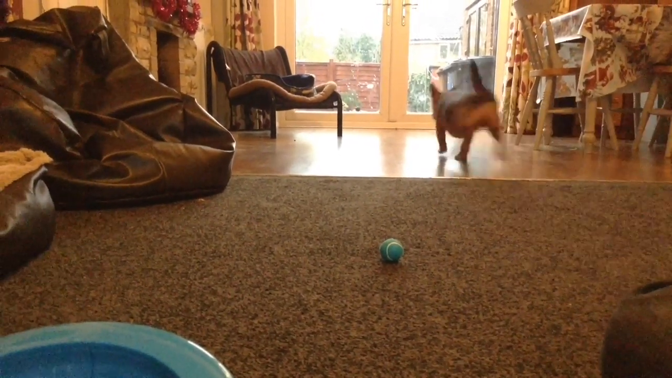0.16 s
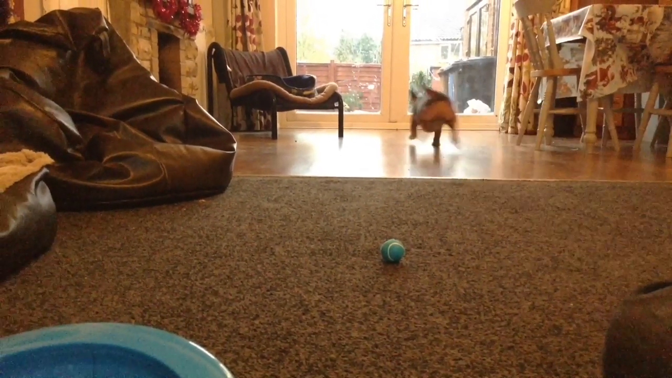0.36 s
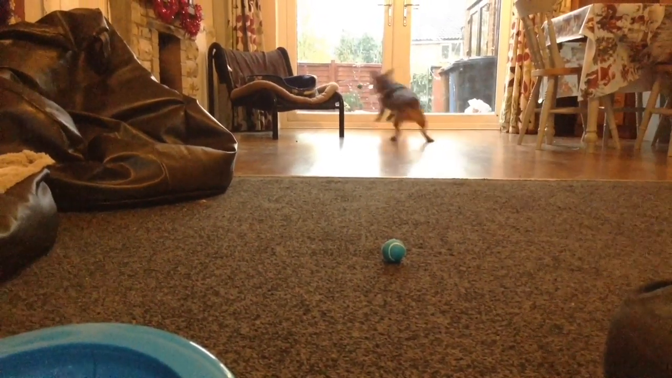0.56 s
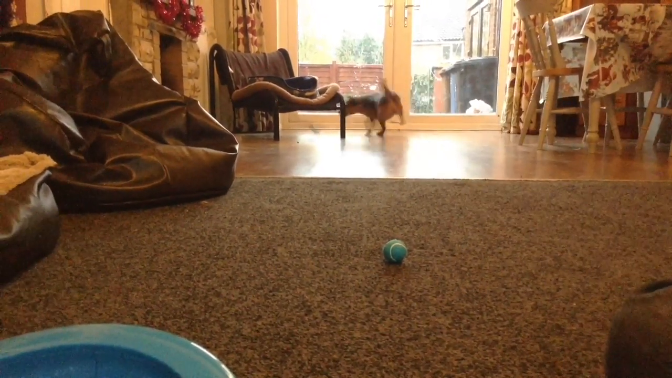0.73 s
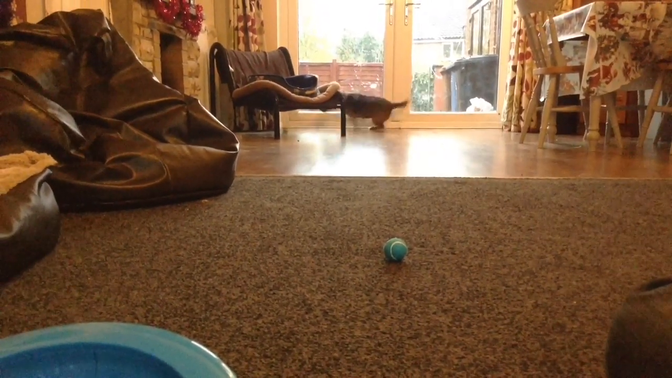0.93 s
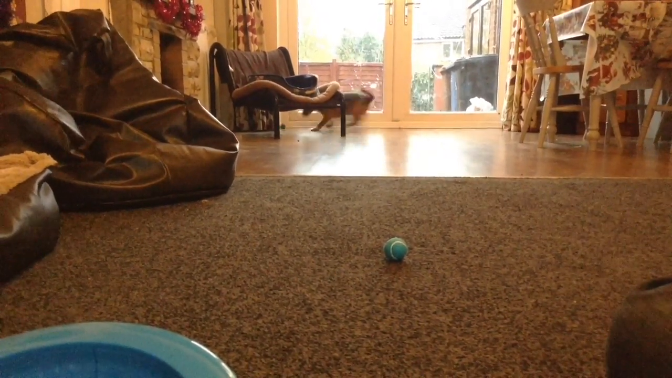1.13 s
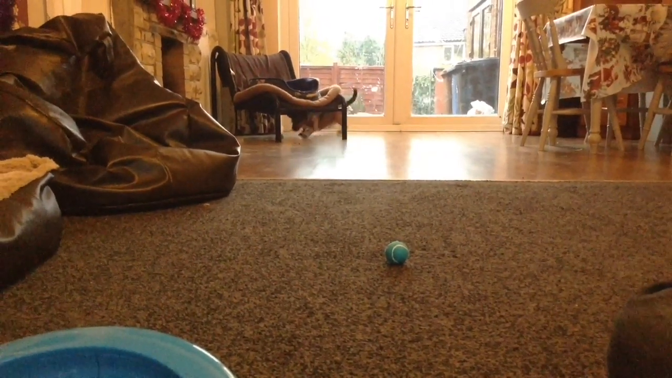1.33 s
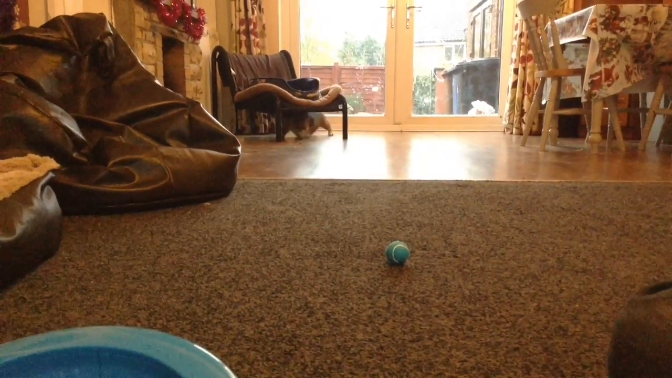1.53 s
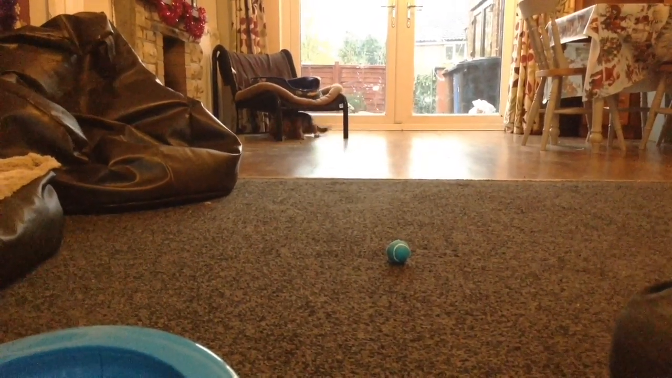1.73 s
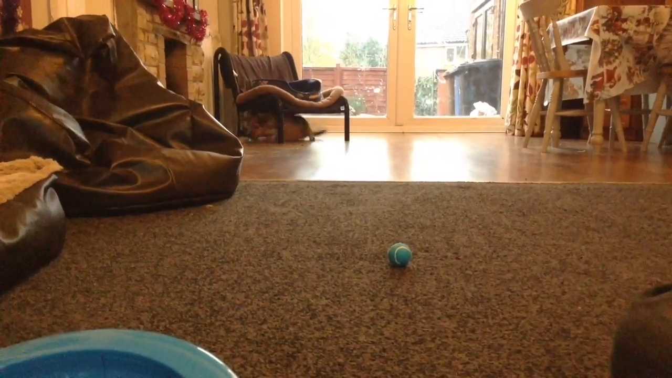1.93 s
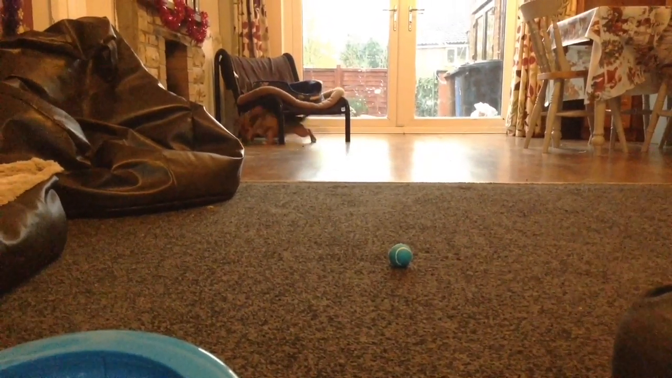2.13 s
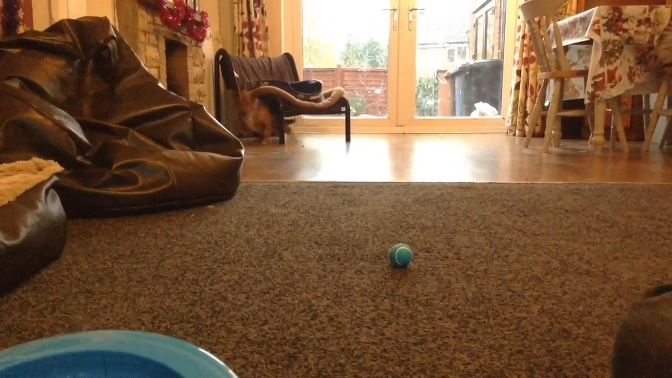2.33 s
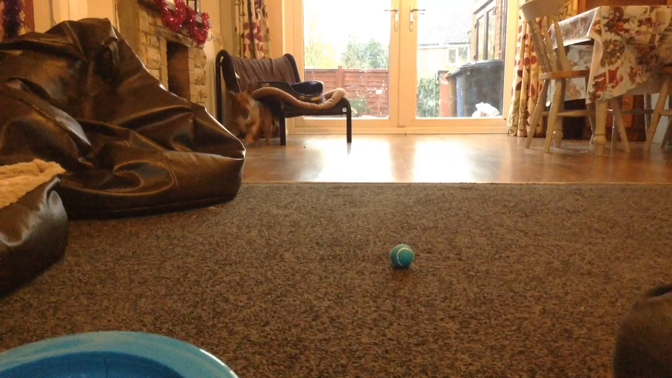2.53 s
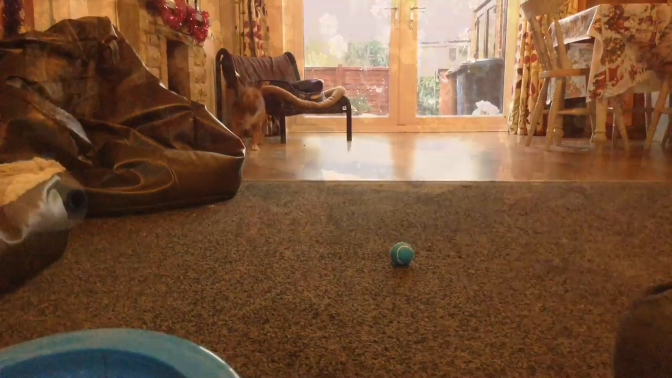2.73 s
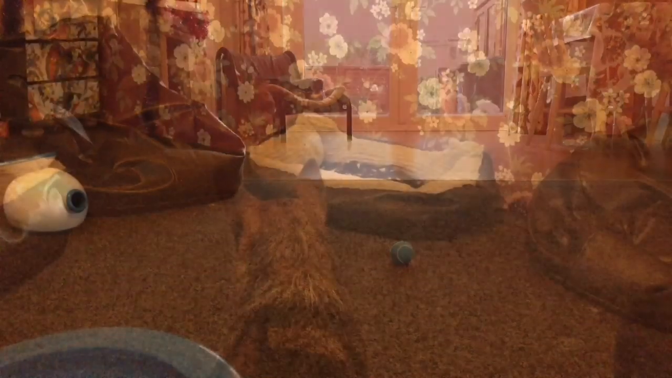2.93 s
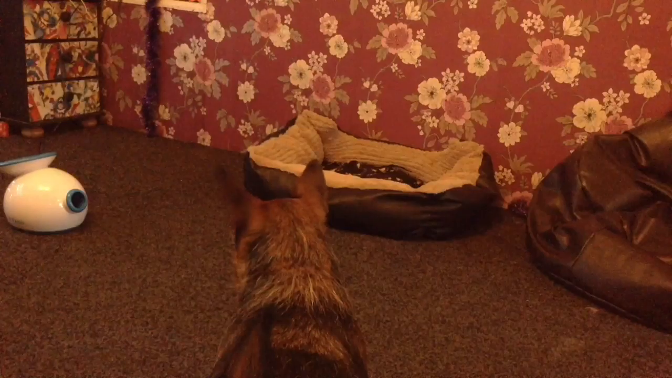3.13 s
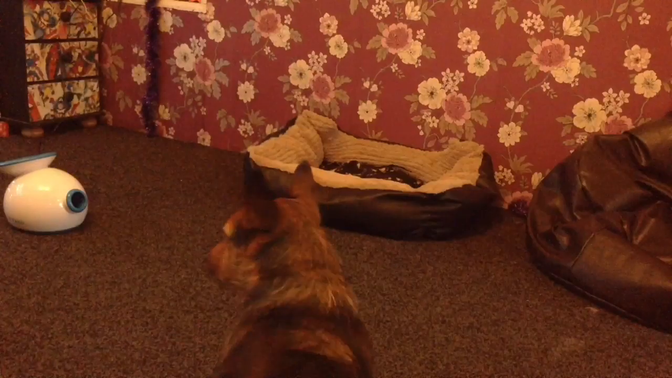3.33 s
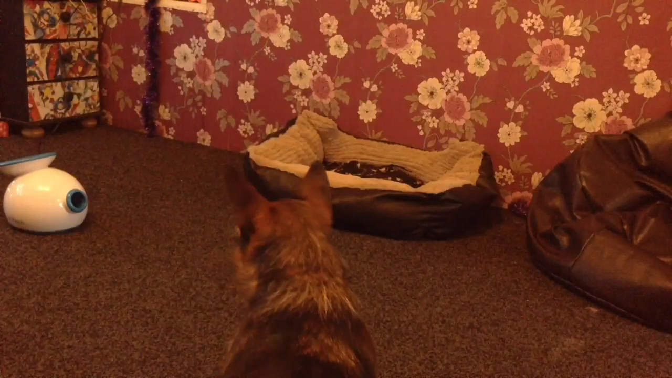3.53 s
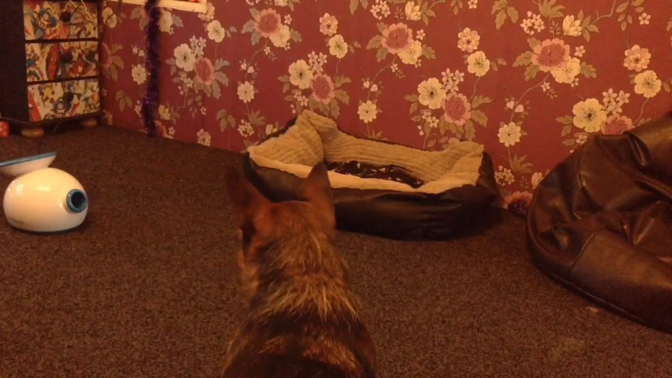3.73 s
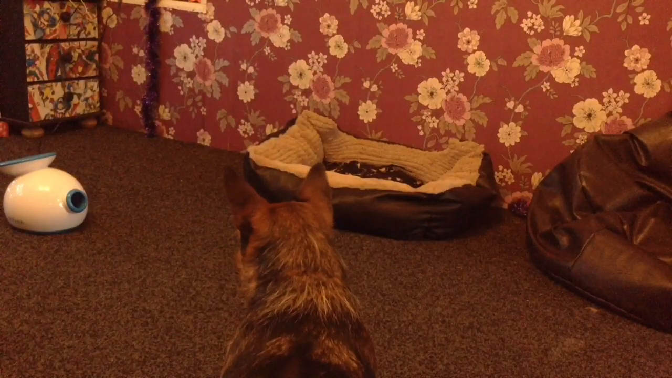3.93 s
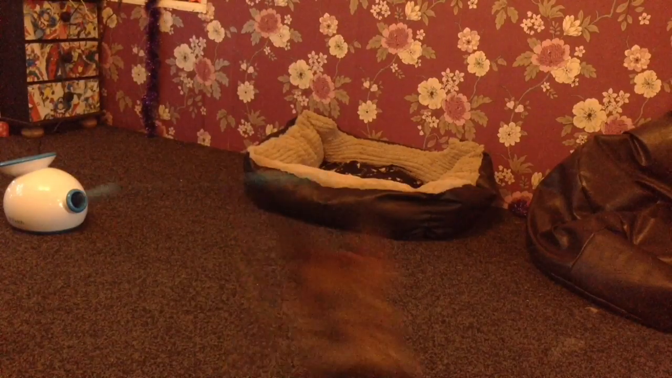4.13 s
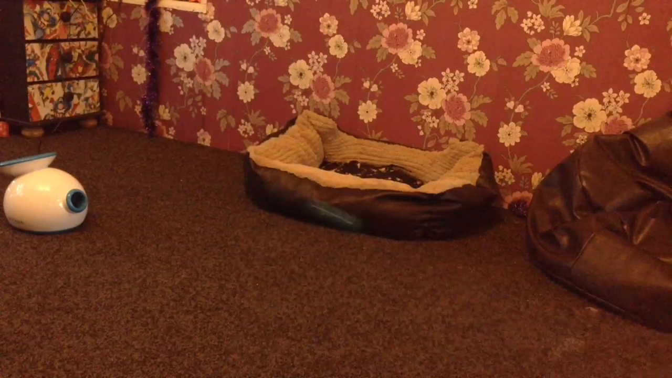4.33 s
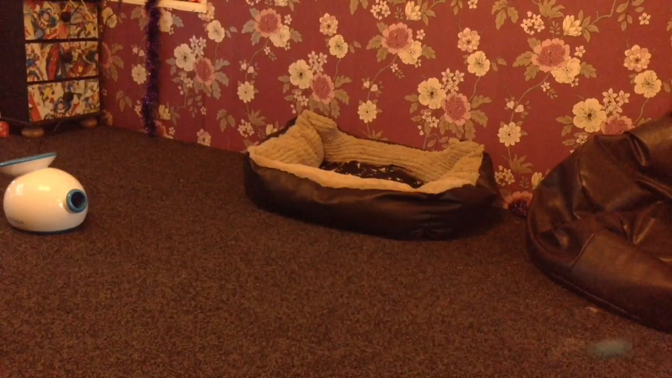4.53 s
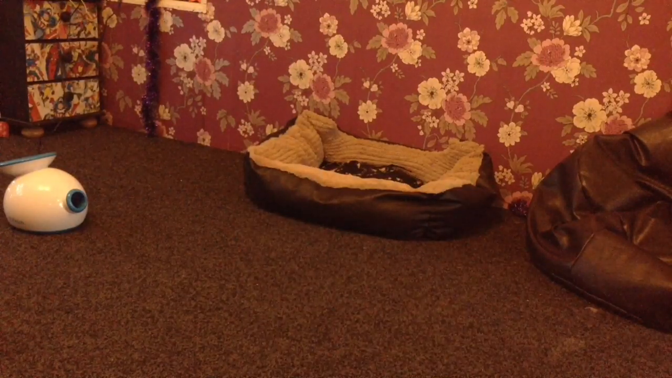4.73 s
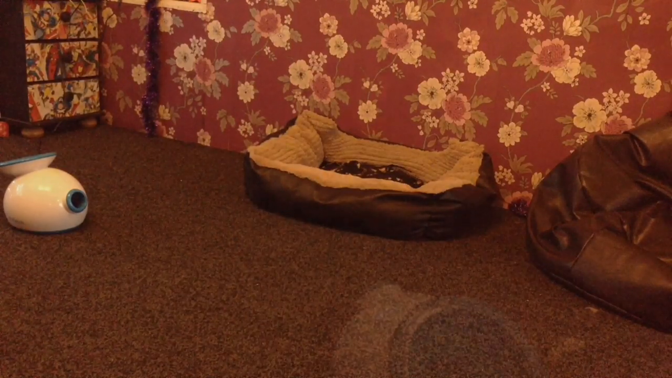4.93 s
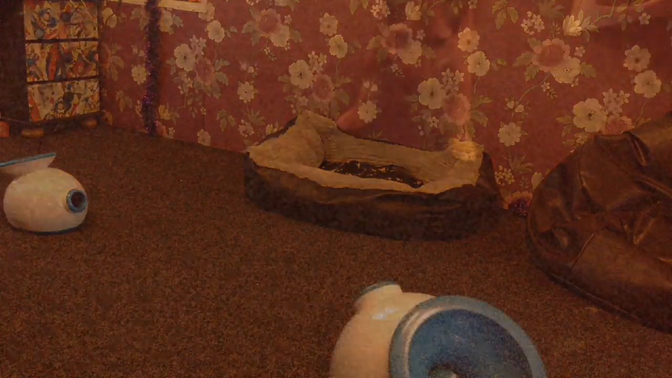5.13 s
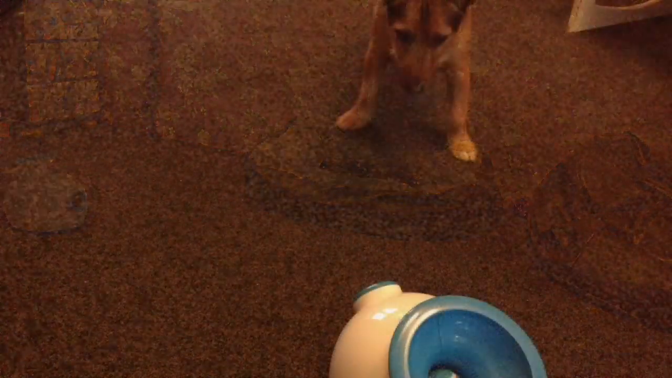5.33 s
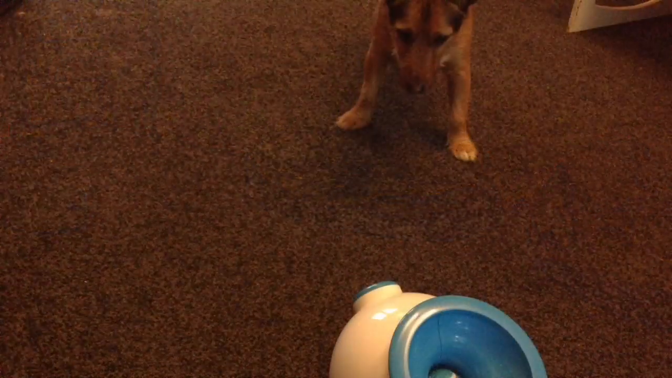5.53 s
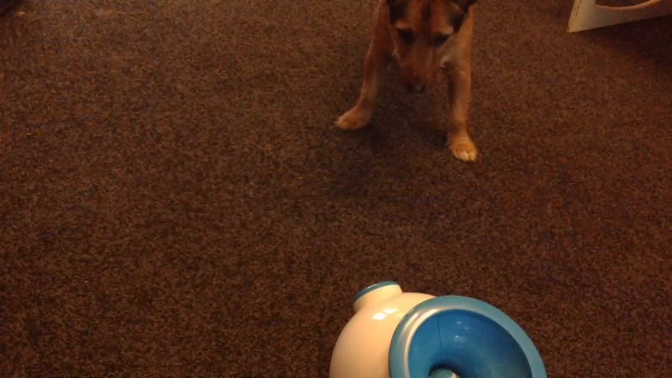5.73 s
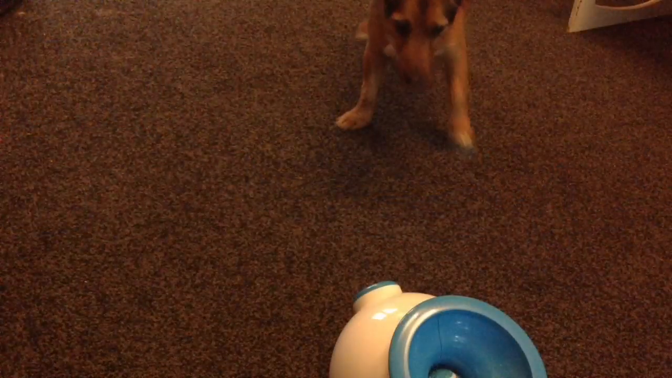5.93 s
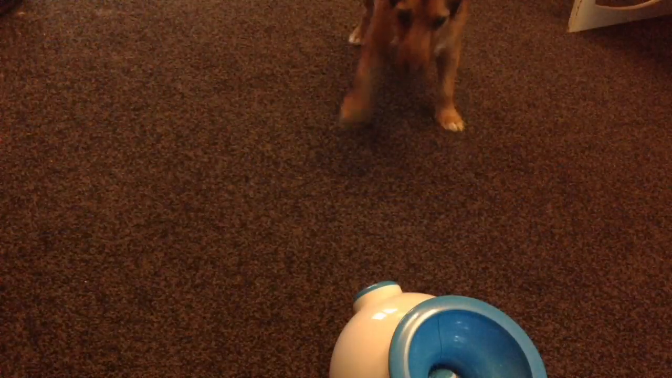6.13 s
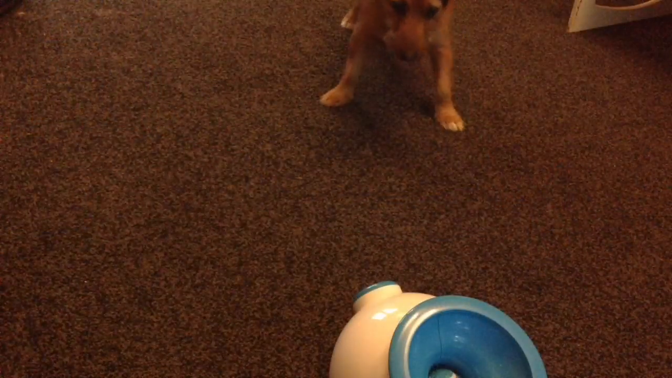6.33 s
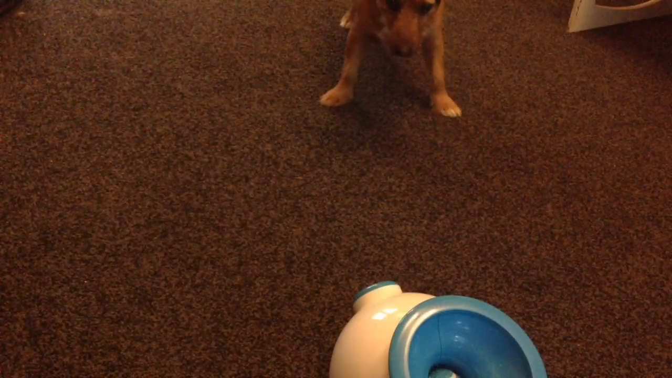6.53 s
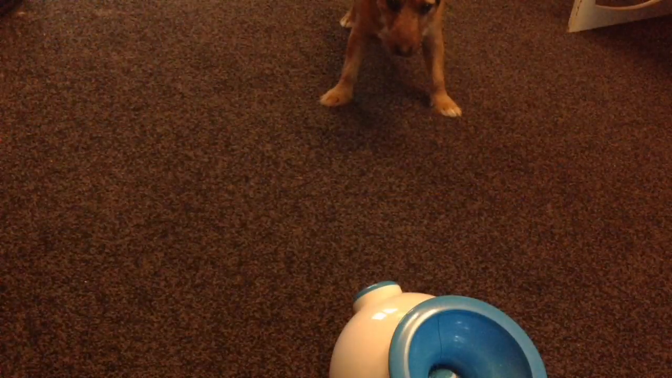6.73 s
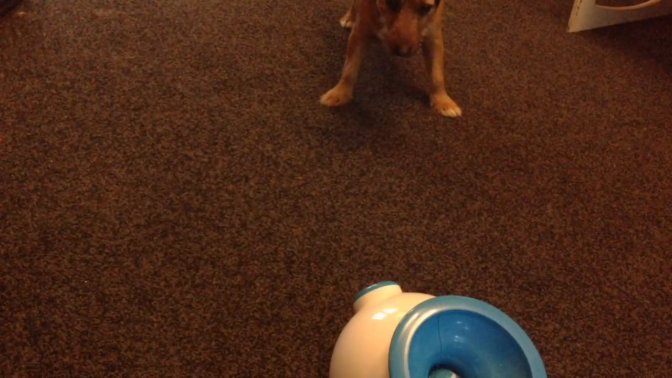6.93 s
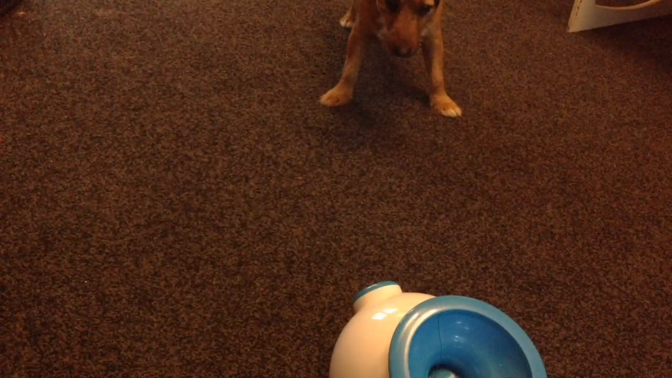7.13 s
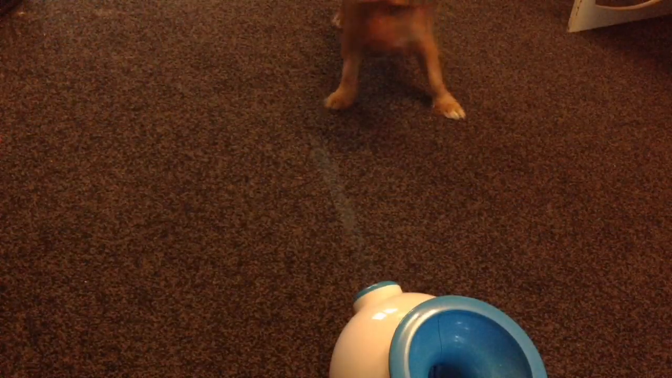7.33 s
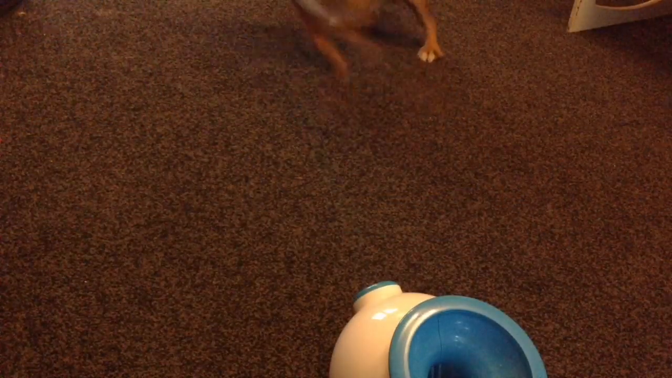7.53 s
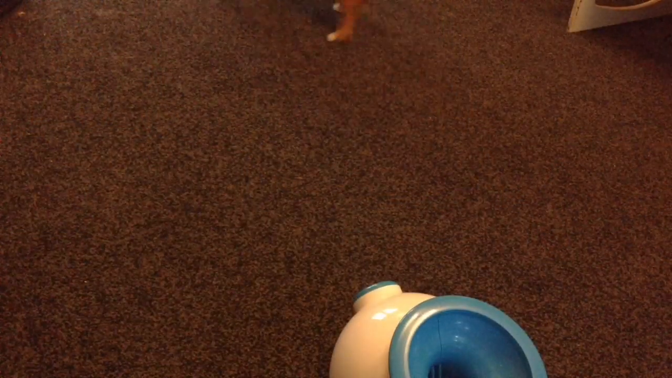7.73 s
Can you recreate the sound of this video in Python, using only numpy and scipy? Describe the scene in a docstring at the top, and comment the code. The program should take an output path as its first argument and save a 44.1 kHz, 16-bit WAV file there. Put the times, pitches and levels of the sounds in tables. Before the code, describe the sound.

Quick paw scrabbling and soft thuds in a furnished room give way to a whirring motor, thin high whine, and two hard plastic launcher shots.

```python
"""A small dog chases balls in a furnished room: paws and balls scuff over a bead-filled bag and carpet,
as dense tiny contacts coloured by fabric. Low thumps of landings and shots ring the floor; short hard
cracks have rattling tails. A plastic launcher fires twice; its motor hums, rattles and winds up repeatedly,
with a thin whine from its switched supply. Room reflections, a whirr and steady hiss surround them."""
import sys
import numpy as np
from scipy import signal
from scipy.fft import rfft, irfft
from scipy.io import wavfile
from scipy.ndimage import uniform_filter1d

SR = 44100
rng = np.random.default_rng(int(sys.argv[2]) if len(sys.argv) > 2 else 0)


def waveform_to_disk(signal):
    """Save audio, clipped to [-1, 1], as 16-bit WAV at the path in sys.argv[1]."""
    frames = np.transpose(np.atleast_2d(signal))
    scaled = np.clip(frames, -1, 1) * 32767
    samples = np.round(scaled).astype(np.int16)
    wavfile.write(sys.argv[1], SR, samples)


def makeup_ratio(level_db):
    """Linear amplitude ratio for a level in decibels (20 dB per factor of ten)."""
    decades = np.asarray(level_db, float) / 20
    return 10 ** decades


N = 347067   # samples, about 7.87 s


def rms_one(x):
    """Scale to rms 1."""
    return x / np.sqrt(np.mean(x ** 2) + 1e-20)


def after(s):
    """Seconds since a moment, negative before it."""
    return np.arange(N) / SR - s


def in_time(points):
    """Join a table of times and values by straight lines, at every sample."""
    s, values = np.transpose(points)
    return np.interp(np.arange(N) / SR, s, values)


def at_hz(points, hz):
    """Read a table on a log-frequency axis."""
    table_hz, values = np.transpose(points)
    return np.interp(np.log(hz + 1), np.log(table_hz), values)


def waver(per_s):
    """Slow chance: random values joined by straight lines, at most 40 a second."""
    knots = rng.standard_normal(int(N / SR * 40) + 2)
    return np.interp(np.arange(N) / SR * min(per_s, 40), np.arange(len(knots)), knots)


def band(x, low_hz, high_hz):
    """Butterworth band-pass."""
    return signal.sosfilt(signal.butter(2, [low_hz, high_hz], "band", fs=SR, output="sos"), x)


def three_bands(x, dip_hz=0):
    """Low, middle and high part, each rms 1; the middle is inverted so that the bands join smoothly."""
    edges = [(1, 500, 2600 - dip_hz), (-1, 2600 + dip_hz, 7000), (1, 7000, 18000)]
    return [sign * rms_one(band(x, low, high)) for sign, low, high in edges]


def resonances(x, peaks, wider):
    """Parallel resonances with alternating signs; wider multiplies every width."""
    out = 0
    for k, (hz, width, db) in enumerate(peaks):
        r = np.exp(-np.pi * width * wider / SR)
        top = [(1 - r * r) / 2, 0, (r * r - 1) / 2]
        bottom = [1, -2 * r * np.cos(2 * np.pi * hz / SR), r * r]
        out = out + (-1) ** k * makeup_ratio(db) * signal.lfilter(top, bottom, x)
    return out


def ring(x, hz, t60):
    """A unit click sets a sine of height 1 ringing."""
    r, w = makeup_ratio(-60 / (t60 * SR)), 2 * np.pi * hz / SR
    return signal.lfilter([0, np.sin(w)], [1, -2 * r * np.cos(w), r * r], x + 1e-18)


def grains(per_s, spread_db):
    """Random clicks of uneven size; rms 1."""
    sizes = makeup_ratio(spread_db * np.minimum(rng.exponential(1, N), 5)) * rng.choice([-1, 1], N)
    return rms_one(sizes * (rng.random(N) < per_s / SR))


def add(out, s, piece):
    """Mix a piece in at a time."""
    at = max(round(s * SR), 0)
    out[at:at + len(piece)] += piece[:N - at]


# paws and balls dragging over beads and pile; low_db is the low band over the middle one:
# start_s, level_db (relative), low_db, decay_t60_s
SCUFF_EVENTS = [(0.0, -16, -9, 0.35), (0.114, -14, -42, 0.39), (0.184, -21, -37, 0.67),
                (0.351, -26.5, 8, 0.38), (0.412, -18, -33, 0.86), (0.526, -16, -9, 0.73),
                (0.729, -15, -26.5, 0.11), (0.7542, -19.5, -12, 1), (0.871, -14.5, -10, 0.96),
                (1.243, -22, -34, 1), (1.386, -39.5, 11.5, 0.61), (1.464, -12, -11, 0.27),
                (1.5194, -23, -25, 0.69), (1.657, -27, -10, 0.6), (1.703, -13.5, -32, 0.44),
                (1.842, -14, -13.5, 1), (2.06, -20.5, -40, 0.4), (2.253, -24, -11, 0.83),
                (2.481, -42, 16.5, 0.4), (2.6894, -35.5, -25.5, 0.49), (2.8853, -41, -16, 0.13),
                (4.091, -35, 14, 0.31), (4.149, -43, -2, 0.93), (4.439, -37, -4, 0.29),
                (4.498, -21, 6, 0.22), (4.528, -35, 16.5, 0.32), (4.6349, -20.5, -18, 0.32),
                (4.682, -21, -25, 0.41), (4.799, -18.5, -21, 0.35), (4.9053, -21, -27, 0.44),
                (4.9871, -30.5, 7, 0.15), (5.057, -18, -34, 0.31), (5.106, -17, -18, 0.8),
                (5.2394, -29.5, -18, 1), (6.4394, -42.5, -7, 1), (0.925, -29, -8, .2),
                (7.354, -29, -2, 0.13), (7.754, -29, 18, 0.12)]
# colour of the fabric: pitch_hz, width_hz (before widening), level_db
FABRIC_PEAKS = [(1000, 460, -5.5), (1760, 270, 1.5), (3790, 500, 4.5), (4550, 395, 6), (11900, 9300, 4)]
# treble of the scuffs, over 7 kHz: time_s, level_db
SCUFF_TREBLE_CURVE = [(0, -5), (1, -6.5), (2.3, -12.5), (4, 11), (4.6, 0.5), (5.1, -6), (6.4, 2.5),
                      (7.75, 5.5)]
SCUFF_RISE_S, SCUFF_DB = 0.0095, -11.0
CLAW_TICKS_PER_S, CLAW_DB = 220, -6.5
PATCHY_DB, PATCHES_PER_S = 2, 38   # the drag catches and slips, unevenly in colour


def scuffs():
    """Thousands of tiny contacts and sparser claw ticks swell and die away, coloured by the fabric."""
    rub = grains(6000, spread_db=-0.5) + makeup_ratio(CLAW_DB) * grains(CLAW_TICKS_PER_S, spread_db=3)
    coloured = resonances(rub, FABRIC_PEAKS, wider=1.27) + 0.045 * rub
    low, middle, high = three_bands(coloured, dip_hz=367)
    middle = middle * makeup_ratio(PATCHY_DB * waver(PATCHES_PER_S))
    high = high * makeup_ratio(PATCHY_DB * waver(PATCHES_PER_S))
    low_level, upper_level = np.zeros(N), np.zeros(N)
    t = np.arange(round(SR * .6)) / SR
    for s, db, low_db, t60 in SCUFF_EVENTS:
        swell = (1 - np.exp(-t / SCUFF_RISE_S)) * makeup_ratio(-60 * t / t60)
        swell = swell / swell.max() * makeup_ratio(db + SCUFF_DB)
        add(low_level, s, swell * makeup_ratio(low_db))
        add(upper_level, s, swell)
    return low_level * low + upper_level * (middle + makeup_ratio(in_time(SCUFF_TREBLE_CURVE)) * high)


# soft brushes against furniture, each with one broad ring: start_s, level_db, pitch_hz
BRUSH_EVENTS = [(0.701, -28, 1450), (1.114, -28.5, 930), (1.77, -24.5, 850), (4.38, -34, 520),
                (4.435, -31, 476), (4.445, -37, 770), (4.503, -23, 2350), (5.107, -24, 3800)]
BRUSH_RISE_S, BRUSH_T60_S, BRUSH_WIDTH = 0.0015, 0.36, 0.16   # width as a share of the pitch


def brushes():
    """Noise swells in one broad resonance and dies away."""
    out, t = np.zeros(N), np.arange(round(SR * .4)) / SR
    swell = (1 - np.exp(-t / BRUSH_RISE_S)) * makeup_ratio(-60 * t / BRUSH_T60_S)
    for s, db, hz in BRUSH_EVENTS:
        peak = [(hz, BRUSH_WIDTH * hz, 0)]
        add(out, s, makeup_ratio(db) * swell * rms_one(resonances(rng.standard_normal(len(t)), peak, wider=1)))
    return out


# low thumps: soft landings, and the thump under each shot:
# start_s, peak_db, pitch_hz of the strongest ring, ring_t60_s
THUD_EVENTS = [(0.076, -16, 298, 0.053), (0.117, -22.5, 193, 0.074), (0.278, -33, 300, 0.36),
               (0.334, -20.5, 235, 0.35), (0.369, -14, 216, 0.015), (0.406, -13.5, 228, 0.16),
               (0.451, -19, 242, 0.077), (0.527, -15.5, 338, 0.23), (0.7, -29, 306, 0.66),
               (0.749, -18, 288, 0.055), (0.785, -12.5, 265, 0.06), (1.015, -14, 263, 0.071),
               (1.262, -24.5, 242.3, 0.59), (1.472, -9.5, 296, 0.034), (1.481, -9, 326, 0.062),
               (1.528, -11, 198, 0.038), (1.71, -17, 285, 0.066), (1.847, -20, 274, 0.023),
               (1.984, -3.5, 347, 0.043), (2.485, -16.5, 283, 0.023), (3.915, -20, 380, 0.17),
               (4.089, -22.5, 233.5, 0.3), (4.15, -28, 236, 0.29), (4.637, -12.5, 324, 0.11),
               (4.985, -20.5, 345, 0.12), (5.122, -23.5, 318, .15), (5.225, -23, 330, 0.042),
               (5.235, -16, 340, 0.074), (7.18, -22, 364, 0.25), (7.313, -30, 322, 0.036),
               (7.363, -12.5, 314, 0.045), (7.386, -35, 300, 0.04), (7.443, -29, 283, 0.068),
               (7.688, -25, 376, 0.084)]
# modes of the floor: pitch_hz, level_db
FLOOR = [(150, -6.5), (222, 2), (280, 12), (310, 3.5), (366, -11), (430, 1.5)]


def thuds():
    """A push rings one strong pitch and, with new strengths each time, the floor's modes."""
    out, click = np.zeros(N), np.zeros(round(SR * .5))
    click[0] = 1
    chance_db = rng.normal(0, 4, (len(THUD_EVENTS), len(FLOOR)))
    for (s, db, spot_hz, t60), row in zip(THUD_EVENTS, chance_db):
        boom = sum(makeup_ratio(mode_db + c) * ring(click, hz, t60) for (hz, mode_db), c in zip(FLOOR, row))
        boom = band(boom + makeup_ratio(17.5) * ring(click, spot_hz, t60), 151, 1.88 * spot_hz)
        boom = boom + makeup_ratio(-3) * ring(click, 43, 0.56)   # a deep, longer ring below
        add(out, s, makeup_ratio(db) * boom / np.abs(boom).max())
    return out


# short hard cracks: ticks, bounces and the blow of the second shot; level_db is the crack's peak between
# 2.6 and 7 kHz, low_db and high_db the bands beside it relative to that:
# start_s, level_db, low_db, high_db, pitch_hz of the hollow
CRACK_EVENTS = [(1.4653, -24, -22, 13, 1780), (3.362, -41, -7, 8, 1010), (3.385, -34.5, 2, 15, 880),
                (4.09, -15, -4.5, -20, 870), (4.143, -28.5, -17, 6, 1500), (4.296, -46, 15.5, 5, 1890),
                (4.5025, -9, -5, -8, 2470), (4.511, -18, 0.5, -10, 1690), (4.518, -16, 3, -10, 2330),
                (4.529, -15, 4, -14, 2300), (4.548, -21, 1, -10, 1690), (4.6351, -14.5, -32, 0, 1700),
                (4.6838, -12.5, -7.5, -30, 873), (4.7869, -10, -20, -1, 770),
                (4.9053, -13.5, -22, -19, 1550), (5.0554, -22, -3.5, 3, 790),
                (7.178, -4.5, -9.5, -27, 1800), (7.3092, -31, 16, 4, 1480), (7.3575, -23, 10, -8, 2490),
                (7.3645, -23, 12.5, -1.5, 1100), (7.393, -33, 12, -5, 1000), (7.4035, -32, 16, -3, 1010),
                (7.416, -33, 12, 4, 950), (7.4915, -35, 19.5, -8, 1500), (7.5114, -39.5, 22, -32, 770),
                (7.5617, -34.5, 17.5, -3, 1490), (7.6194, -40, 12.5, -21, 860), (7.644, -41, 21, -28, 910),
                (7.7028, -39, 8, 10, 650), (7.762, -30, 13, -15, 1370), (7.7685, -1.5, -6.5, -5, 1550),
                (7.798, -10.5, -7, -4, 1560), (7.803, -19, 5, -9, 2000), (7.818, -18, 2.5, -13, 1460),
                (7.831, -26, -2, -10, 2000)]
# the launcher fires, a catch and then the blow (the second shot's loud blow is among the short cracks):
# start_s, level_db, low_db, high_db, pitch_hz
SHOT_EVENTS = [(3.9065, -27, 7, -4, 1420), (3.9112, -6.5, -11, -4, 5160), (3.914, -22, 7.5, -7, 890),
               (3.923, -16.5, -3, 2, 900), (3.94, -19, 8, 0, 2370), (3.959, -30, 0, -1, 2360),
               (7.1738, -20, 10.5, 11.5, 1840), (7.1771, -11.5, -6, -23, 1030)]
# rings of the plastic shell: pitch_hz, level_db, ring_t60_s
SHELL_RINGS = [(380, 0, .05), (890, 0, .05), (1350, -5, .025), (1750, -6, .025), (2370, -3, .035),
               (4830, -1, .015)]
TOUCH_S = .0008   # a contact takes a moment to build
SNAP = 1.2   # height of the first touch beside the crack's noise


def cracks(blows, contact_t60, tail_db, shell):
    """A short crack with a dense rattling tail; it rings a hollow of its own and the plastic shell."""
    out, t = np.zeros(N), np.arange(round(SR * .5)) / SR
    chance_db = rng.normal(0, 3, (len(blows), len(SHELL_RINGS)))
    for (s, db, low_db, high_db, hollow_hz), row in zip(blows, chance_db):
        noise = rng.standard_normal(len(t))
        touch = SNAP * (t == t[round(TOUCH_S * SR)])
        crack = noise * (1 - np.exp(-t / TOUCH_S)) * makeup_ratio(-60 * t / contact_t60) + touch
        body = rms_one(sum(makeup_ratio(mode_db + c) * rms_one(ring(crack, hz, ring_s))
                           for (hz, mode_db, ring_s), c in zip(SHELL_RINGS, row)))
        hollow = rms_one(ring(crack, hollow_hz, 22 / hollow_hz))
        low, middle, high = three_bands(rms_one(crack) + shell * body)
        low = rms_one(band(low, 300, 3000)) + .5 * shell * body
        if hollow_hz < 2600:
            low = low + 1.3 * hollow
        else:
            middle = middle + 1.5 * hollow
        tails = three_bands(noise)
        # the hollow colours the rattle
        tails[0] = rms_one(3.6 * tails[0] + rms_one(ring(noise, hollow_hz, 8 / hollow_hz)))
        tail_t60s = [.4, .33, .25]   # the treble dies first
        for part, tail, part_db, t60 in zip([low, middle, high], tails, [low_db, 0, high_db], tail_t60s):
            dying = makeup_ratio(tail_db) * tail * (1 - np.exp(-t / 0.026)) * makeup_ratio(-60 * t / t60)
            add(out, s, makeup_ratio(db + part_db) * (part / np.abs(part).max() + dying))
    return out


# dry treble ticks of claws: start_s, peak_db, low_edge_hz
TICK_EVENTS = [(0.5521, -10, 6000), (0.7475, -4, 5000), (0.887, -4, 3100), (0.9013, -7, 7100),
               (1.5244, -10, 6000), (3.3792, -14.5, 9500)]


def dry_ticks():
    """Snaps with no body: a click and a few milliseconds of dying noise, treble only."""
    out, t = np.zeros(N), np.arange(round(SR * .02)) / SR
    for s, db, edge_hz in TICK_EVENTS:
        tail = .25 * rng.standard_normal(len(t)) * makeup_ratio(-60 * t / .006)
        snap = band((t == 0) + tail, edge_hz, 16000)
        add(out, s, makeup_ratio(db) * snap / np.abs(snap).max())
    return out


# bouts of loose parts and scrabbling claws: start_s, hold_s, level_db, shaken_housing_level_db
BOUT_EVENTS = [(0, 1.6, -46, -83), (4.08, 0.15, -37, -30.5), (4.45, 0.69, -40.5, -61),
               (7.295, 0.17, -48.5, -33), (7.483, 0.27, -48, -39.5), (7.753, 0.028, -55, -36)]
BOUT_ATTACK_S, BOUT_RELEASE_DB_PER_S = 0.01, 104


def bouts(column):
    """Attack, hold and a steady release for every bout; one at time 0 starts at full level."""
    out = 0
    for row in BOUT_EVENTS:
        start_s, hold_s = row[:2]
        release_db = BOUT_RELEASE_DB_PER_S * np.maximum(after(start_s + hold_s), 0)
        attack = np.clip(after(start_s) / BOUT_ATTACK_S + (start_s <= 0), 0, 1)
        out = out + makeup_ratio(row[column] - release_db) * attack
    return out


CONTACTS_PER_S = 160


def clatter():
    """Uneven small contacts, each setting off a few neighbouring short resonances."""
    contacts, dealt = grains(CONTACTS_PER_S, spread_db=3.5), rng.integers(0, 16, N)
    rings = 0
    for k, hz in enumerate(np.geomspace(300, 3500, 16)):
        rings = rings + ring(contacts * (abs(dealt - k) < 3), hz, 12.0 / hz) * hz ** -.1
    return bouts(column=2) * rms_one(rings)


# the motor winds up again from a lower speed: start_s, first_wheel_turns_per_s, second_wheel_turns_per_s
WINDUP_EVENTS = [(0, 30, 36), (2.6, 40, 47.5), (4.0, 9.5, 18), (5.1, 24, 34), (7.2, 30, 36)]
TOP_TURNS_PER_S, WINDUP_S, SLOWING_S = (63, 70), (1.0, 2.2), .05   # the pairs are for each wheel


def shaft_speed(wheel):
    """Each wind-up climbs exponentially towards top speed; drops take a moment."""
    turns, top = np.zeros(N), TOP_TURNS_PER_S[wheel]
    for s, *starts in WINDUP_EVENTS:
        climb = top - (top - starts[wheel]) * np.exp(-after(s) / WINDUP_S[wheel])
        turns = np.where(after(s) >= 0, climb, turns)
    return uniform_filter1d(turns, size=round(SLOWING_S * SR))


# shaft multiples that stand out, as multiple: level_db
STRONG_MULTIPLES = {4: 3, 6: 6, 17: 5}
HUM_FALL = 0.88   # harmonic k of the shaft has height k to the minus this
HUM_WAVER_DB, HUM_WAVERS_PER_S = 2.5, 3


def harmonics(angle):
    """Multiples of a turning shaft, each swelling on its own."""
    starts, out = rng.uniform(0, 2 * np.pi, 24), 0
    for k in range(3, 22):
        db = STRONG_MULTIPLES.get(k, 0) + HUM_WAVER_DB * waver(HUM_WAVERS_PER_S)
        out = out + k ** -HUM_FALL * makeup_ratio(db) * np.sin(k * angle + starts[k])
    return out


# depth of the whine's ripple: time_s, depth (0-1)
RIPPLE_CURVE = [(3.9, .65), (7.2, .45), (7.4, .3)]
WHINE_HZ, HALF_WHINE_DB, DOUBLE_WHINE_DB = 5534, -19, -30
WHINE_WAVER_DB, WHINE_SWING = 1.5, .07   # slow swells; phase swing (radians) with the poles


def whine(angle):
    """A thin supply tone; the motor's three poles a turn modulate its height and phase."""
    t = np.arange(N) / SR
    ripple = 1 + in_time(RIPPLE_CURVE) * makeup_ratio(2 * waver(12)) * np.cos(3 * angle) + .09 * np.cos(6 * angle)
    ripple = ripple + .14 * np.cos(angle) + .09 * np.cos(2 * angle)
    tone = np.sin(2 * np.pi * WHINE_HZ * t + WHINE_SWING * np.sin(3 * angle))
    out = np.sqrt(2) * ripple * makeup_ratio(WHINE_WAVER_DB * waver(9)) * tone
    out += makeup_ratio(HALF_WHINE_DB) * np.sin(np.pi * WHINE_HZ * t)
    out += makeup_ratio(DOUBLE_WHINE_DB) * np.sin(4 * np.pi * WHINE_HZ * t)
    return out + 0.13 * rms_one(band(rng.standard_normal(N), 5000, 6100))   # sparking smears the line


# colour of the launcher's housing: pitch_hz, width_hz (before widening), level_db
HOUSING_PEAKS = [(285, 72, 6), (499, 38, 3), (1010, 257, 5), (1530, 320, -2.5), (1907, 300, -1.5),
                 (2640, 52, -8.5), (4360, 840, -23)]
# how near the launcher is heard: time_s, level_db
NEARNESS_CURVE = [(2.6, -39), (2.85, -21.5), (3.15, -7.5), (5.05, -7), (5.4, 0)]
# brief dips of the whine: start_s, depth_db, hold_s
WHINE_DIP_EVENTS = [(3.37, -1, .0), (3.913, -18, 0.17), (4.506, -4, 0.75), (7.18, -4, 0.25),
                    (7.736, -17, .2)]
DIP_RECOVERY_S = 0.27
HUM_DB, RATTLE_DB, WHINE_DB = -42.5, -39, -44.5   # heard near; hum and rattle at 60 turns per s
HUM_DB_PER_TURN, RATTLE_DB_PER_TURN, SECOND_HUM_DB = 0.09, 0.35, -4
SHAKES_PER_S = 1600   # loose parts of the housing


def motor():
    """Harmonics of two wheels and brush rattle sound through the housing, with the whine on top."""
    near_db, turns_hz = in_time(NEARNESS_CURVE), shaft_speed(wheel=0)
    faster = turns_hz - 60
    angle, second = 2 * np.pi * np.cumsum([turns_hz, shaft_speed(wheel=1)], axis=1) / SR
    hum = harmonics(angle) + makeup_ratio(SECOND_HUM_DB) * harmonics(second)
    hum = resonances(hum, HOUSING_PEAKS, wider=1.5) + .1 * hum
    hum = rms_one(band(band(hum, 235, 3000), 235, 3000))
    rattle = rng.standard_normal(N) * (1 + 0.3 * np.sin(second) + .3 * np.cos(2 * second))
    rattle = rms_one(band(resonances(rattle, HOUSING_PEAKS, wider=0.53), 360, 20000))
    shaken = resonances(grains(SHAKES_PER_S, spread_db=2.0), HOUSING_PEAKS, wider=0.8)
    shaken = bouts(column=3) * rms_one(band(shaken, 285, 20000))
    dip_db = 0
    for s, db, hold in WHINE_DIP_EVENTS:
        dip_db = dip_db + db * np.clip(1 - after(s + hold) / DIP_RECOVERY_S, 0, 1) * (after(s) > 0)
    hum = makeup_ratio(HUM_DB + near_db + HUM_DB_PER_TURN * faster) * hum
    rattle = makeup_ratio(RATTLE_DB + near_db + RATTLE_DB_PER_TURN * faster) * rattle
    return hum + rattle + shaken + makeup_ratio(WHINE_DB + near_db + dip_db) * whine(angle)


# a broad whirr, gone after the first seconds: time_s, level_db
WHIRR_CURVE = [(0, -33), (1, -33.5), (1.5, -40), (2, -33.5), (2.4, -37.5), (3.1, -47.5), (3.3, -108)]
# colour of the whirr: pitch_hz, width_hz (before widening), level_db
WHIRR_COLOUR = [(235, 45, 8), (444, 163, -5), (1010, 162, 2.5), (1500, 630, -8.5), (1928, 144, 2)]
WHIRR_FLUTTER_DB, WHIRR_FLUTTERS_PER_S = 2.5, 30


def whirr():
    """Fluttering noise in a few resonances, band-passed between 170 and 1700 Hz."""
    noise = band(resonances(rng.standard_normal(N), WHIRR_COLOUR, wider=0.81), 170, 1700)
    flutter_db = WHIRR_FLUTTER_DB * waver(WHIRR_FLUTTERS_PER_S)
    return makeup_ratio(in_time(WHIRR_CURVE) + flutter_db) * rms_one(noise)


# how long the furnished room rings: pitch_hz, decay_t60_s
ROOM_DECAY = [(150, 0.47), (500, 0.28), (1400, 0.51), (3700, 0.25), (9700, 0.038), (15000, 0.25)]


def room(x, count=4):
    """Reflections as noise that dies away at its own rate in each band; the pattern keeps changing."""
    t = np.arange(round(SR * .7)) / SR
    edges = np.geomspace(80, 16000, 11)
    noise, tails = rng.standard_normal((count, len(t))), 0
    for k, (low, high) in enumerate(zip(edges, edges[1:])):
        fall = makeup_ratio(-60 * t / at_hz(ROOM_DECAY, np.sqrt(low * high)))
        tails = tails + band(noise[:, ::(-1) ** k], low, high) * fall   # every other band reads backwards
    tails *= np.clip((t - .004) / 0.0018, 0, 1)   # the first wall answers after a few ms
    place = np.arange(N) / SR / .04 % count   # crossfades to the next pattern every 40 ms
    out = 0
    for k, tail in enumerate(tails):
        away = np.minimum(abs(place - k), count - abs(place - k))
        share = np.clip(1 - away, 0, 1)
        out = out + signal.fftconvolve(x * np.sqrt(share), tail / np.sqrt(np.sum(tail ** 2)))[:N]
    return out


# level of the background: time_s, level_db
AIR_CURVE = [(0, -48), (2.6, -47.5), (3.1, -47), (5.0, -40.5), (5.4, -50.5), (7.1, -45.5), (7.87, -45)]
# colour of the background: pitch_hz, level_db (per Hz, relative)
HISS_COLOUR = [(18, -10), (60, 4), (110, -0.5), (160, -5), (277, 7.5), (691, 1), (1140, -1.5), (1330, 1),
               (3400, -9.5), (5170, -8), (5590, -9), (6720, -15.5), (11000, -14), (13500, -13.5),
               (15500, -8.5)]


def hiss():
    """Air and microphone noise, shaped in frequency."""
    hz = np.arange(N // 2 + 1) * SR / N
    noise = irfft(rfft(rng.standard_normal(N)) * makeup_ratio(at_hz(HISS_COLOUR, hz)), N)
    return makeup_ratio(in_time(AIR_CURVE)) * rms_one(noise)


# level of the dog, blows and their reflections, with a drop and a return: time_s, level_db
FADE_CURVE = [(5.3, -2.5), (5.42, -14), (6, -18), (6.1, 0)]


def scene():
    """Direct sounds, their reflections, the motor and the background."""
    rubbed, soft, loose = scuffs() + brushes(), thuds(), clatter()
    hard = cracks(CRACK_EVENTS, contact_t60=0.014, tail_db=-26.5, shell=.2)
    hard = hard + cracks(SHOT_EVENTS, contact_t60=0.049, tail_db=-15.5, shell=.6) + dry_ticks()
    reflected = room(makeup_ratio(-9.0) * rubbed + makeup_ratio(-3.0) * soft + makeup_ratio(-9.0) * hard + makeup_ratio(-7.0) * loose)
    action = makeup_ratio(in_time(FADE_CURVE)) * (rubbed + soft + hard + loose + reflected)
    return (action + motor() + whirr() + hiss())[None]


def band_limit(x):
    """A steep low-pass at the top of the band."""
    return signal.sosfilt(signal.butter(12, 16480, fs=SR, output="sos"), x)


def record(dry):
    """The microphone cuts the bass steeply, peaks are rounded, the top is cut."""
    bass_cut = signal.butter(4, 150, "high", fs=SR, output="sos")
    x = signal.sosfilt(bass_cut, dry) + makeup_ratio(-34) * dry   # a little bass leaks through
    rounded = .95 * np.tanh(x / .95)
    top_cut = signal.ellip(12, .5, 75, 15330, fs=SR, output="sos")   # cutoff in Hz
    return band_limit(signal.sosfilt(top_cut, rounded))


dry = scene()
out = record(dry)
waveform_to_disk(out)
```